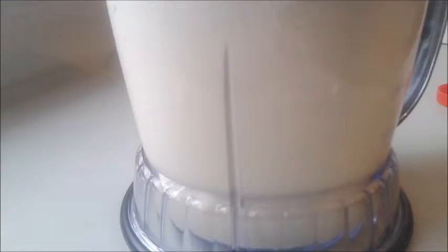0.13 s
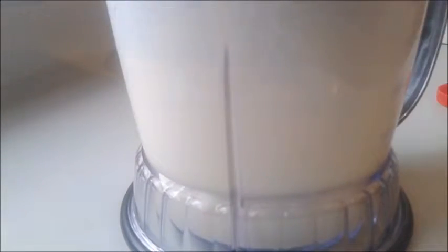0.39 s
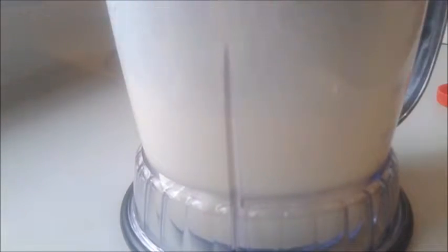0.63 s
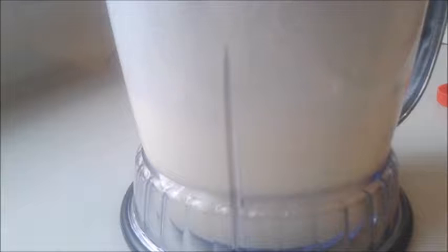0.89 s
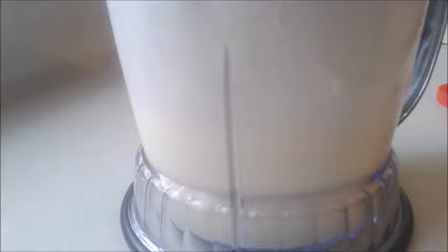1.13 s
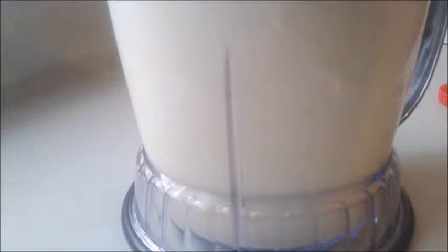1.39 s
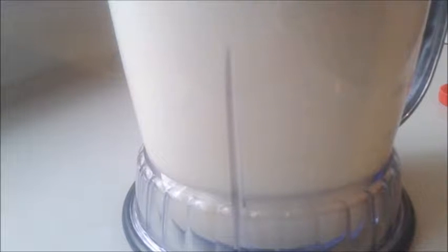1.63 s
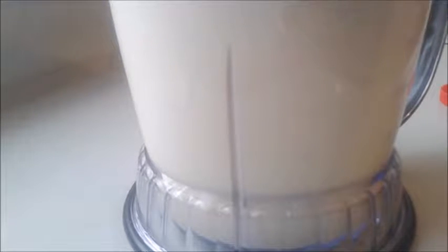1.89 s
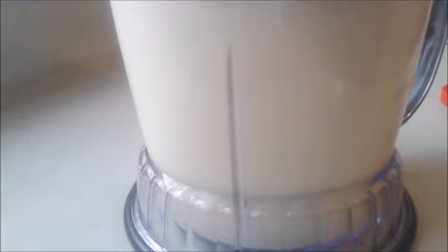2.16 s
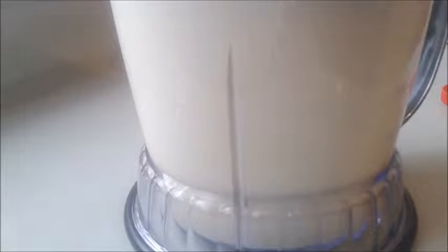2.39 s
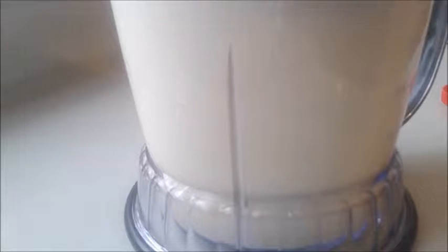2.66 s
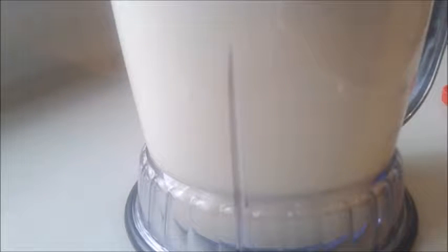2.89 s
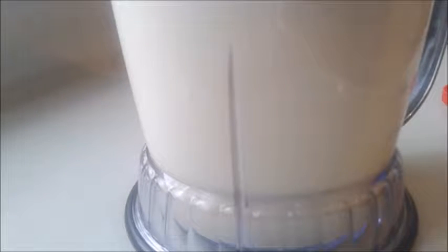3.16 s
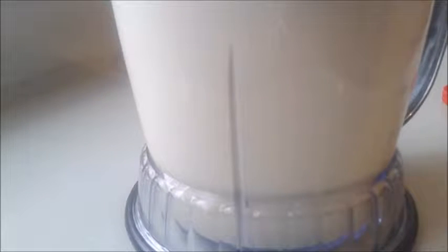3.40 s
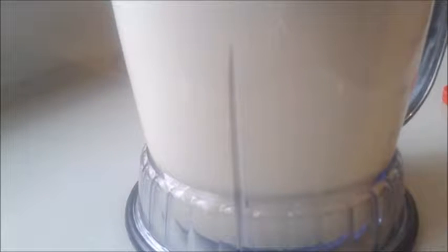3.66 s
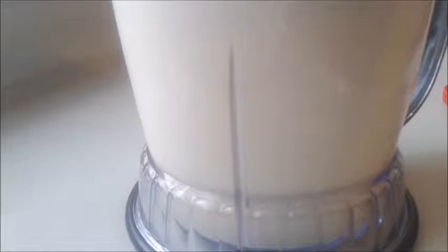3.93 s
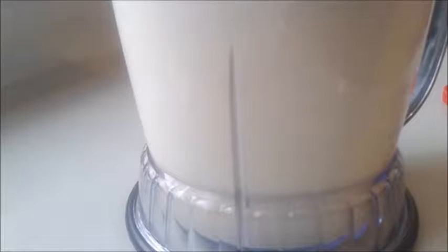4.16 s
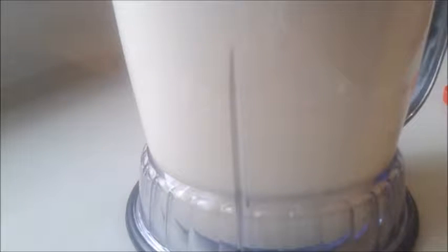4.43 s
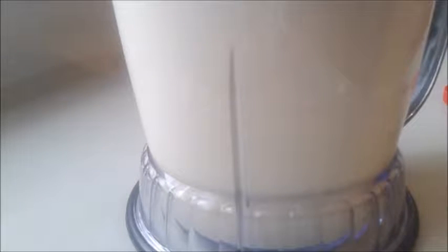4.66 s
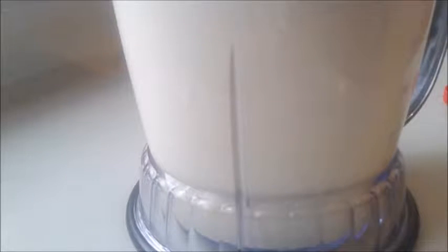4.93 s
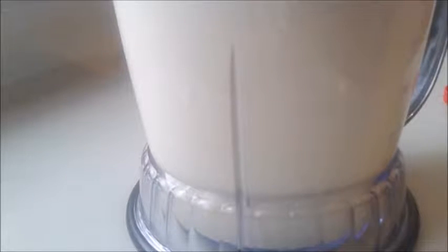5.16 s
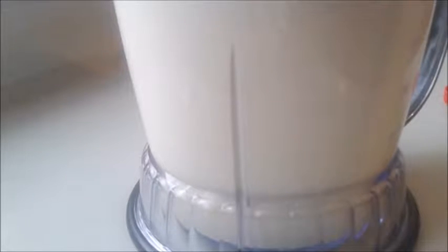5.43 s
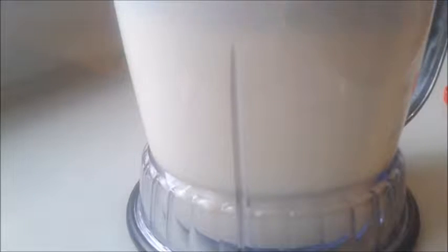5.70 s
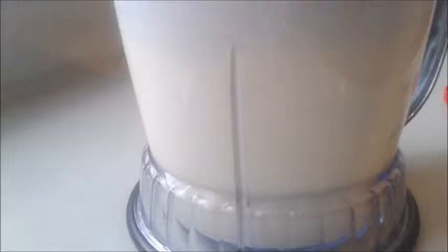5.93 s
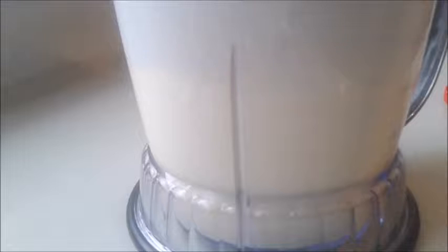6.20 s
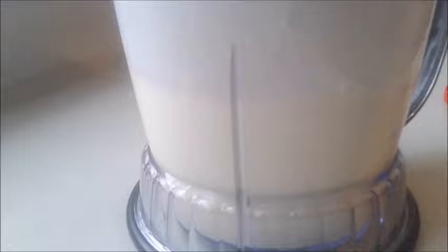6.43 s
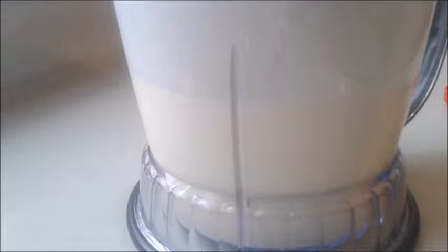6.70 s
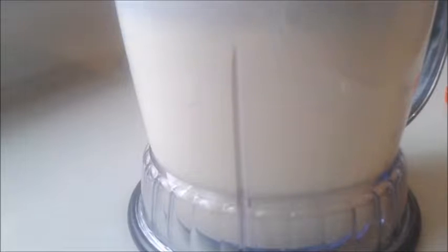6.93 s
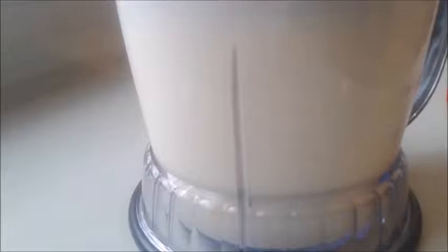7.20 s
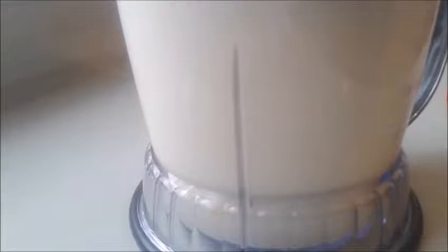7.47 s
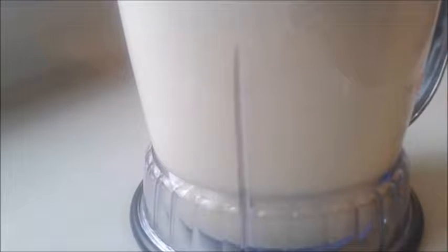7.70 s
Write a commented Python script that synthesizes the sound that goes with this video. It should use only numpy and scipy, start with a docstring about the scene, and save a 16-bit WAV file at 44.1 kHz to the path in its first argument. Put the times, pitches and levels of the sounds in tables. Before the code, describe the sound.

Close in a quiet kitchen, a blender's last spin fades away, followed by sharp knocks on plastic and counter. A loud switch clack starts a long, dense burst of rough liquid churning, motor hum and high buzzing whine. The pitch falls as it is switched off; after a faint rustle and soft taps, another clack brings the roar back, lasting to the end.

```python
"""A small blender on a kitchen counter coasts down, its body ringing low; knocks fill the pause.
It is switched on for a long burst: the motor hums and whines, the blades churn a thick drink, the jar rings.
It coasts down again; in the second pause come a faint rustle and more knocks, then it starts once more.
Churning is shaped noise, the whine follows the computed shaft speed, and knocks are noise through resonances.
A small hard room answers the knocks, and a quiet room tone lies under everything."""
import sys
import numpy as np
from scipy import signal
from scipy.io import wavfile
from scipy.ndimage import uniform_filter1d

SR = 44100
rng = np.random.default_rng(int(sys.argv[2]) if len(sys.argv) > 2 else 0)


def waveform_to_disk(signal):
    """Save audio, clipped to [-1, 1], as 16-bit WAV at the path in sys.argv[1]."""
    frames = np.transpose(np.atleast_2d(signal))
    scaled = np.clip(frames, -1, 1) * 32767
    samples = np.round(scaled).astype(np.int16)
    wavfile.write(sys.argv[1], SR, samples)


def amp(db):
    return 10 ** (np.asarray(db, float) / 20)


N = 345303
T = np.arange(N) / SR  # time, s

# times when the current is on: (on t/s, off t/s, spin-up time/s, speed lost to unmixed lumps/(turns/s),
# coasting time/s)
BURSTS = [(-9, -.1, .15, 0, .62), (1.18, 5.385, .12, 12.5, .8), (6.833, 9, .11, 3.5, .7)]
FULL_SPEED, MIXING_S = 236, 1.5  # turns/s without lumps; the lumps dissolve with this time constant
JERK_S, JERK_SHARE = .02, .52  # about half of the speed comes in the first jerk
FRICTION = 110  # turns/s: bearing friction ends the coasting instead of letting it trail

MAINS_HZ = 100.15  # pulls of the magnet a second
HUM_DB, INRUSH_DB, INRUSH_S = -37.5, 5.5, .25  # louder while the motor draws its starting current

# churning, one table for each run of the blades: (t/s, relative level/dB)
CHURN_RUNS = [
    [(0, -22.5), (.04, -22), (.12, -28), (.27, -29), (.4, -37.5), (.52, -48), (.63, -62.5), (.77, -71)],
    [(1.186, -24.5), (1.23, -23), (2, -21.5), (3.5, -21.5), (5.5, -21.5), (5.67, -24.5), (5.92, -32.5),
     (6.13, -47.5), (6.18, -59), (6.27, -85)],
    [(6.845, -23.5), (6.9, -24), (7.07, -21.5), (7.83, -21)],
]
# churning between the peaks: (f/Hz, relative level per Hz/dB)
ROAR_SPECTRUM = [(18, -67), (30, -30), (96, -5), (131, -15), (237, -2.5), (378, -7), (779, -8), (1010, -12),
                 (1340, -8.5), (1520, -16), (2980, -2.5), (4510, -9), (6480, -12.5), (11400, -18.5),
                 (14400, -72)]
# dips in the roar's spectrum: (f/Hz, width/Hz, level/dB)
SPECTRUM_DIPS = [(9020, 200, -3), (9700, 610, -10), (13000, 700, -8)]
# peaks in the churning's spectrum; jar, base and counter ring at those below 12 kHz,
# the ones above are just faint peaks in the top treble: (f/Hz)
PEAK_HZ = [160, 265, 455, 606, 782, 1340, 1712, 1960, 2257, 2535, 3020, 3974, 5450, 5850, 6290, 6510, 6880,
           9215, 10600, 11600, 12300, 13620, 14100]
# one row for each of those peaks: (width/Hz, relative level/dB)
PEAK_SHAPES = [(23.65, -7.5), (39, -11), (62.7, -10), (34.4, -2.5), (68, -5.5), (120, -6.5), (71, -8.5),
               (90, -8.5), (80, -13), (80, -10), (307, -3.5), (90, -11), (106, -8.5), (110, -47),
               (64, -9.5), (115, -8.5), (80, -12.5), (99, -10), (316, -18), (300, -20), (300, -34),
               (200, -19.5), (150, -30)]
HOUSING_HZ, HOUSING_WIDTH = 3054, 400  # Hz: the motor housing favours tones near here
HOUSING_LATE_DB, HOUSING_LATE_S = -7, .15  # the churning in the housing's band fills in late after a start
KICK_DB, KICK_S = 9, .13  # the base jolts when the current comes on
FIZZ_LOSS_DB, FIZZ_BEND = -15.5, 1.29  # the fizz fades as speed is missing, even more in the top octave

WOBBLE = .27  # wobbles of the rotor in a turn
# tones locked to the shaft: (multiple of the shaft speed)
SHAFT_MULTIPLES = [1, 1.085, 1.18, 12, 13, 13.27, 13.54, 13.77, 14.27, 25]
# one for each of those tones: (level relative to the churning curve/dB)
SHAFT_LEVELS = [-20, -22, -23, -19, -10, -18, -18, -19, -21, -18]
# slots and bars of the rotor howl while the speed changes:
# (multiple of the shaft speed, width/Hz, relative level pulling up/dB, relative level coasting/dB)
ROTOR_HOWL = [(11.8, 190, 8, 6.5), (24, 200, 9.5, 4), (36, 250, -1, -9)]
# ringing as the blades slow: (f/Hz, width/Hz, relative level/dB)
SLOWING_RINGS = [(370, 42, -4), (590, 62, -2), (1200, 22, -10), (3360, 34, -5.5), (5370, 60, -33)]
SHUDDER_DB = 2  # the jar shakes unevenly, about once a turn, while the motor pulls up to speed

# knocks; the first row is the body ringing near 160 Hz as the shaft slows:
# (t/s, peak level/dB, lowest f/Hz, highest f/Hz, t60/s)
RING_AND_KNOCKS = [(0.005, -29, 142, 178, 0.33), (0.786, -37.5, 2260, 6800, 0.24),
                   (0.812, -50, 150, 700, 0.1), (0.858, -24, 200, 5570, 0.29), (1.036, -51, 80, 300, 0.74),
                   (1.109, -34, 100, 520, 0.1), (1.126, -32.5, 70, 259, 0.4),
                   (1.179, -25.5, 200, 11850, 0.16), (6.374, -46, 1200, 2600, 0.042),
                   (6.375, -54, 150, 500, 0.06), (6.651, -52, 300, 900, 0.084),
                   (6.687, -48, 120, 900, 0.072), (6.832, -24, 200, 12900, 0.078)]
# what a knock rings with: (f/Hz, width/Hz, relative level/dB)
COUNTER_MODES = [(120, 40, 15), (174, 50, 14), (240, 60, 13), (400, 160, 15), (620, 250, 5),
                 (1330, 500, 13), (2000, 700, 9), (2700, 800, 9), (3500, 900, 9), (4700, 1400, 5),
                 (7000, 3000, 0)]
# how fast the room dies away: (f/Hz, t60/s)
KITCHEN_DECAY = [(200, 0.15), (1200, 0.36), (4000, 0.28), (9000, 0.038)]

# a faint rustle in the second pause: (start t/s, rise time/s, end t/s, level/dB, lowest f/Hz, highest f/Hz)
RUSTLE = (6.32, .12, 6.84, -62, 1400, 5000)
# colour of the room tone: (f/Hz, relative level per Hz/dB)
ROOM_TONE = [(18, -35.5), (30, 4.5), (150, 8), (277, -3), (341, 7), (441, -2.5), (1150, -14), (1340, -7),
             (3310, -4.5), (7770, -25), (12400, -21), (14400, -5.5)]
ROOM_TONE_DB = -59


def evened(x):
    """Scales a signal to rms 1."""
    return x / np.sqrt(np.mean(x ** 2) + 1e-20)


def read(points, hz):
    """Reads a table over frequency, with straight lines on a log scale between its points."""
    f, value = np.transpose(points)
    return np.interp(np.log(hz + 1), np.log(f + 1), value)


def wander(rate_hz):
    """Random drift of rms 1: noise with everything faster than rate_hz smoothed away."""
    smoother = signal.butter(2, rate_hz, fs=SR, output="sos")
    return evened(signal.sosfilt(smoother, rng.standard_normal(N)))


def bandpass(x, low_hz, high_hz, order):
    """Keeps what lies between two frequencies."""
    band = signal.butter(order, [low_hz, high_hz], btype="band", fs=SR, output="sos")
    return signal.sosfilt(band, x)


def resonate(x, hz, width):
    """A resonance of gain 1 that may move: shifts hz down to zero, smooths, and shifts back."""
    turn = np.exp(2j * np.pi * np.cumsum(hz * np.ones(len(x))) / SR)
    r = np.exp(-np.pi * width / SR)
    return 2 * (turn * signal.lfilter([1 - r], [1, -r], x / turn)).real


def fuzzy_band(hz, width):
    """Noise through the same moving resonance twice, at rms 1."""
    return evened(resonate(resonate(rng.standard_normal(N), hz, width), hz, width))


def noise(gain, size=2048):
    """Noise whose short-time spectrum is gain(hz, t)."""
    hop = size // 4
    hz = np.fft.rfftfreq(size, 1 / SR)[:, None]
    t = np.arange(N // hop + 5) * hop / SR
    real, imag = rng.standard_normal((len(t), len(hz), 2)).T
    return signal.istft((real + 1j * imag) * gain(hz, t), nperseg=size, noverlap=size - hop)[1][:N]


def blender():
    """Hum while the current is on; churning and whine follow the runs of the blades."""
    speed = shaft_speed()
    on, since = powered()
    turns = np.cumsum(speed) / SR
    blades = amp(0.5) * churning(turns, speed, since) + whine(turns, speed, on)
    return hum(on, since) + churn_level() * blades


def powered():
    """Share of current flowing, and seconds since it last came on."""
    on = sum(np.clip((T - a) / .01, 0, 1) * np.clip((b - T) / .03, 0, 1) for a, b, *_ in BURSTS)
    since = np.min([np.where(T >= a, T - a, np.inf) for a, *_ in BURSTS], axis=0)
    return on, since


def shaft_speed():
    """Jerks off, creeps up to full speed as the drink mixes, and coasts down against drag and friction."""
    speed = np.zeros(N)
    for on_s, off_s, up_s, lumps, coast_s in BURSTS:
        t = np.clip(T - on_s, 0, off_s - on_s)
        rise = 1 - JERK_SHARE * np.exp(-t / JERK_S) - (1 - JERK_SHARE) * np.exp(-t / up_s)
        driven = rise * (FULL_SPEED - lumps * np.exp(-t / MIXING_S))
        coast = np.exp(-np.maximum(T - off_s, 0) / coast_s)
        speed += np.maximum((driven + FRICTION) * coast - FRICTION, 0)
    return speed


def missing_speed(speed):
    """Share of full speed still missing."""
    return np.clip(1 - speed / FULL_SPEED, 0, 1)


def churn_level():
    """Loudness of the runs over time, with short fades at their ends and silence between them."""
    rows = np.concatenate(CHURN_RUNS)
    gate = 0
    for run in CHURN_RUNS:
        start, end = run[0][0], run[-1][0]
        gate = gate + np.clip((T - start) / .0087 + 1, 0, 1) * np.clip((end - T) / .03 + 1, 0, 1)
    return gate * amp(np.interp(T, rows[:, 0], rows[:, 1]))


def hum(on, since):
    """The magnet's pull makes a steady low tone, loudest just after the current comes on."""
    level_db = HUM_DB + INRUSH_DB * np.exp(-since / INRUSH_S) + 0.39 * wander(16.0)
    return on * amp(level_db) * np.sqrt(2) * np.sin(2 * np.pi * MAINS_HZ * T)


def churning(turns, speed, since):
    """Liquid thrown round the jar: wide noise with peaks, rumble and fizz swelling on their own."""
    rumble_db = KICK_DB * np.exp(-since / KICK_S) + 0.67 * wander(0.84)
    fizz_db = FIZZ_LOSS_DB * missing_speed(speed) ** FIZZ_BEND + 0.57 * wander(2.3)
    late = np.exp(-since / HOUSING_LATE_S)

    def colour(hz, t):
        peaks = 0
        for f, (w, db) in zip(PEAK_HZ, PEAK_SHAPES):
            peaks = peaks + amp(2 * db) / (1 + (2 * (hz - f) / w) ** 2) ** 1.36
        low = 1 / (1 + (hz / 900) ** 6)
        high = 1 / (1 + (6000 / (hz + 1)) ** 6)
        high = high * (1 + 1.2 / (1 + (10800 / (hz + 1)) ** 12))
        housing = 1 / (1 + ((hz - HOUSING_HZ) / HOUSING_WIDTH) ** 4)
        # random patches, smooth over frequency and time
        patches = rng.standard_normal((len(t), len(hz))).T
        patches = uniform_filter1d(uniform_filter1d(patches, size=8, axis=0), size=12, axis=1)
        tilt_db = 1.8 * evened(patches)
        tilt_db += low * np.interp(t, T, rumble_db) + high * np.interp(t, T, fizz_db)
        tilt_db += HOUSING_LATE_DB * np.interp(t, T, late) * housing
        dip_db = sum(db * np.exp(-(2 * (hz - f) / w) ** 4) for f, w, db in SPECTRUM_DIPS)
        # powers add; amp(2 * dB) turns dB into power
        between = amp(2 * (read(ROAR_SPECTRUM, hz) + dip_db - 4.75))
        return np.sqrt(between + peaks * amp(1.5)) * amp(tilt_db)

    roar = noise(colour)
    roar /= np.sqrt(np.mean(roar[2 * SR:5 * SR] ** 2))  # rms 1 in the middle of the long burst
    slopping = amp(1.25 * wander(19.5) + .5 * wander(160.0))
    # one beat for each turn of the shaft, and one for each wobble
    beat = 1 + 0.038 * np.cos(2 * np.pi * turns) + 0.037 * np.cos(2 * np.pi * WOBBLE * turns)
    return roar * slopping * beat


def whine(turns, speed, on):
    """Sounds tied to the shaft, shaken by the mains pull and by a slower wobble of the rotor."""
    lag = missing_speed(speed)
    slip = .001 * wander(36.0) + .025 * wander(2.)  # the load tugs at the shaft, in turns
    housing = 0.12 + 1 / (1 + (2 * (13 * speed - HOUSING_HZ) / HOUSING_WIDTH) ** 2)
    out = amp(-9.5) * housing * fuzzy_band(12.8 * speed, 190)  # fuzzy skirt round the main tones
    out += brushes(speed) + howl(speed, on, lag) + shaft_tones(turns + slip, housing, lag)
    out += amp(SHUDDER_DB) * on * lag * (1 - lag) * fuzzy_band(speed, 60)
    pull = 2 * np.pi * MAINS_HZ * T
    wobble = 2 * np.pi * WOBBLE * turns
    shake = 1 + on * (0.25 * np.cos(pull) + 0.24 * np.cos(pull - wobble)) + 0.033 * np.cos(wobble)
    return out * shake + (1 - on) * lag ** 4.4 * slowing(turns + slip)


def shaft_tones(turns, housing, lag):
    """Tones at multiples of the shaft speed; those near the housing's band are lifted by it."""
    out = np.zeros(N)
    for k, db in zip(SHAFT_MULTIPLES, SHAFT_LEVELS):
        level = amp(db + 1.5 * wander(12.0) + 1.4 * wander(.8))
        tone = level * np.sqrt(2) * np.cos(2 * np.pi * k * turns)
        out += tone * (housing if 10 < k < 20 else (1 - lag) ** 2)
    return out


def brushes(speed):
    """Brushes hiss over the commutator: noise through two resonances that follow the shaft."""
    hiss = resonate(rng.standard_normal(N), 33.0 * speed, 430)
    return amp(-17.5) * evened(resonate(hiss, 25.6 * speed, 390))


def howl(speed, on, lag):
    """Slots and bars of the rotor: noise bands that glide with the shaft while its speed changes."""
    out = np.zeros(N)
    for k, width, up_db, down_db in ROTOR_HOWL:
        level = np.where(on > .5, amp(up_db), amp(down_db)) * amp(2.5 * wander(15.))
        out += level * lag * (1 - lag) ** 2 * fuzzy_band(k * speed, width)
    return out


def slowing(turns):
    """Fixed resonances ring as the blades slow, and the two blades beat slower and slower."""
    rings = sum(amp(db) * evened(resonate(rng.standard_normal(N), hz, w)) for hz, w, db in SLOWING_RINGS)
    return rings + amp(-6.5) * np.cos(2 * np.pi * 2 * turns)


def ring_and_knocks():
    """The body's low ring, then a hand on switch and counter: noise bursts in the same modes, each in a band."""
    out = np.zeros(N + SR)
    t = np.arange(SR // 2) / SR
    for start, db, low_hz, top_hz, t60 in RING_AND_KNOCKS:
        # hard blows reach higher and crack first
        fade = amp(-60 * t / t60) + top_hz / 3000 * amp(-60 * t / 0.046)
        rattle = rng.standard_normal(len(t)) * fade
        ring = np.zeros(len(t))
        for k, (hz, width, mode_db) in enumerate(COUNTER_MODES):
            ring += (-1) ** k * amp(mode_db) * resonate(rattle, hz, width) / np.sqrt(width)
        # loose parts chatter between the modes
        ring += amp(-24) * rng.standard_normal(len(t)) * abs(rattle)
        ring = bandpass(ring, low_hz, top_hz, 2)
        out[round(start * SR):][:len(t)] += amp(db) * ring / abs(ring).max()
    return out[:N]


def kitchen(x):
    """The room's answer: sparse echoes of random sign, each band dying at its own speed."""
    taps = np.zeros(SR)
    at = np.arange(200, SR - 20, 20)
    taps[at + rng.integers(0, 20, len(at))] = rng.choice([-1., 1.], len(at))
    hz, t, z = signal.stft(taps, SR, nperseg=256)
    t60 = np.maximum(read(KITCHEN_DECAY, hz), .02)[:, None]
    tail = signal.istft(z * amp(-60 * t / t60), SR, nperseg=256)[1]
    return signal.fftconvolve(x, tail / np.linalg.norm(tail))[:N]


def rustle():
    """Soft grainy noise in the middle band, perhaps a hand moving over the base."""
    start, rise, end, db, low_hz, high_hz = RUSTLE
    grains = evened(bandpass(rng.standard_normal(N), low_hz, high_hz, 4))
    gate = np.clip((T - start) / rise, 0, 1) * (T < end)
    return amp(db + 1.9 * wander(25.)) * gate * grains


def room_tone():
    """Steady quiet noise with a fixed colour."""
    return amp(ROOM_TONE_DB) * evened(noise(lambda hz, t: amp(read(ROOM_TONE, hz))))


def scene():
    """Blender, low ring and knocks with the room's answer to them, rustle and room tone, in one channel."""
    hits = ring_and_knocks()
    mix = blender() + hits + amp(-5) * kitchen(hits) + rustle() + room_tone()
    return mix[None]


def roll_off(x):
    """The treble ends steeply here."""
    return signal.sosfilt(signal.butter(12, 14590, fs=SR, output="sos"), x)


def record(dry):
    """Turns the finished mix into the sound that is stored, with a rougher and duller treble."""
    return roll_off(dry)


dry = scene()
out = record(dry)
waveform_to_disk(out)
```